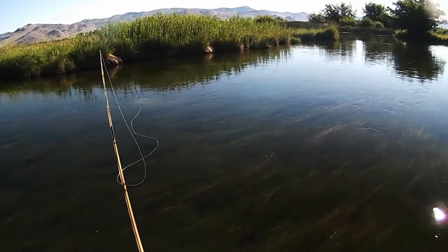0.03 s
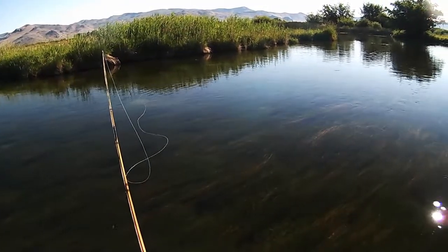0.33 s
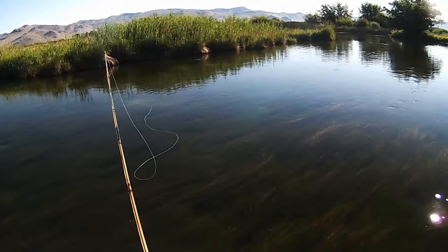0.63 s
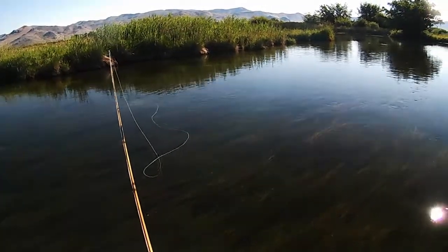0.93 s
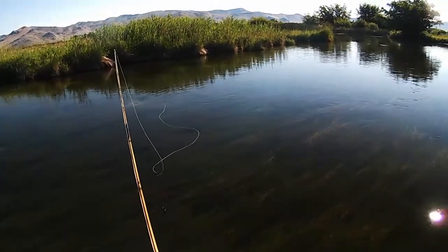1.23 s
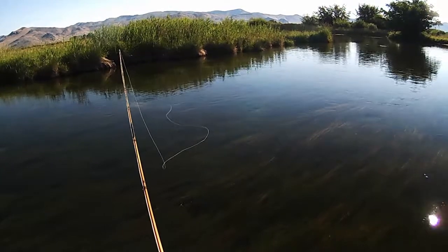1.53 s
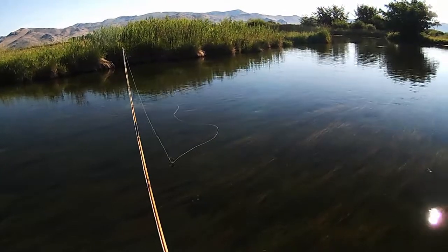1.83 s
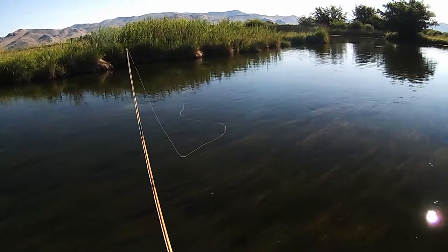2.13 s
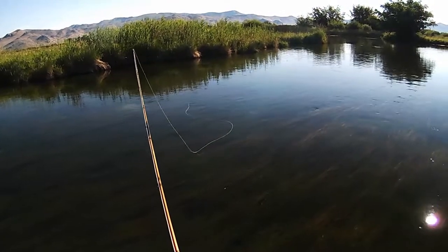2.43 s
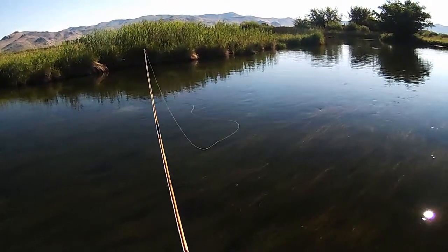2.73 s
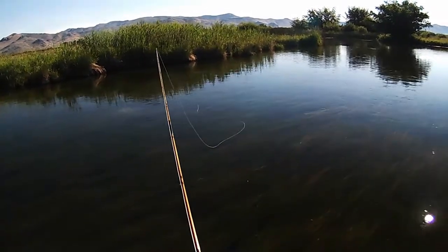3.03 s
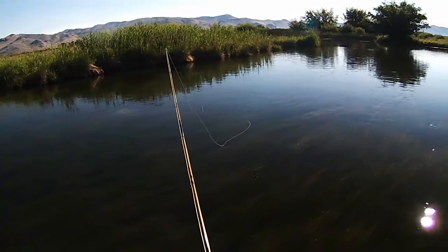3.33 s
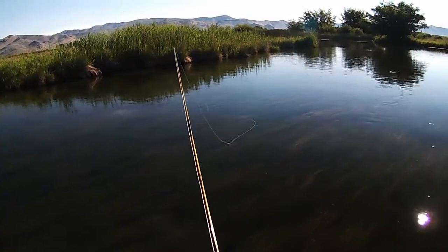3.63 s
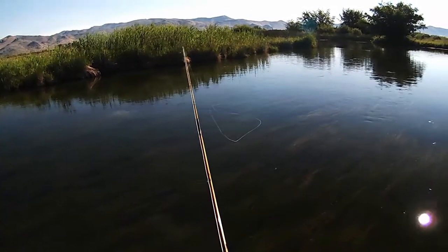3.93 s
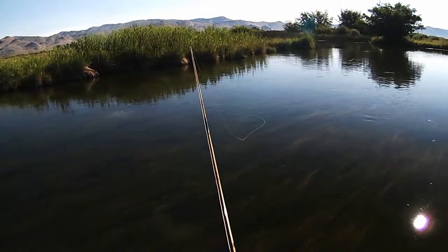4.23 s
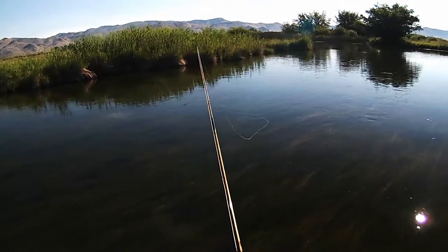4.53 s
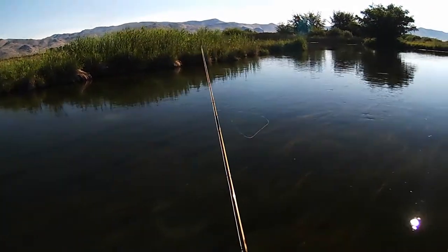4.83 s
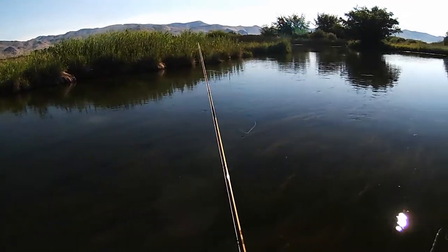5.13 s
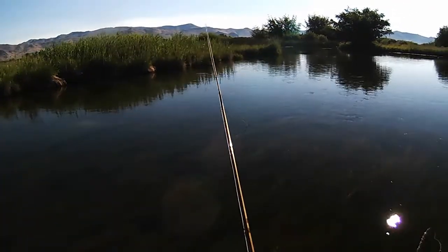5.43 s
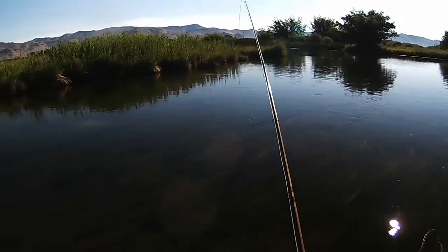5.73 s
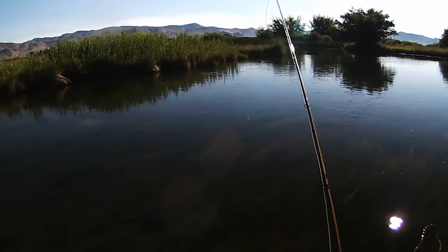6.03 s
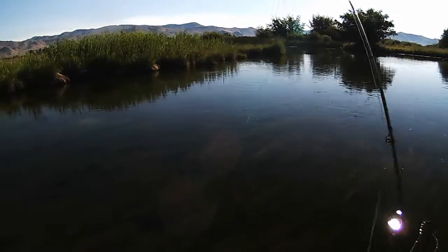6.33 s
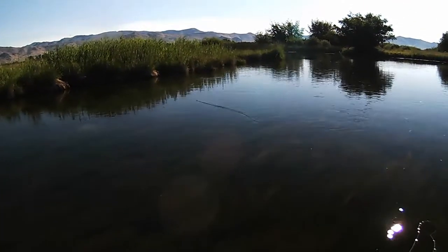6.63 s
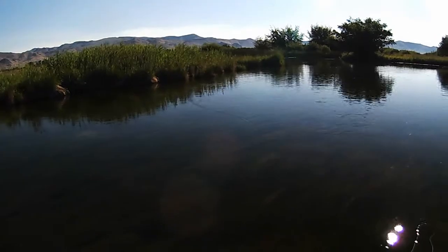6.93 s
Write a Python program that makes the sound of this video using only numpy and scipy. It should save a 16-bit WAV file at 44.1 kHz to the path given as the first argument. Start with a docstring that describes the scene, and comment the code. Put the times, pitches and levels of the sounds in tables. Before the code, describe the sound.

A dull, steady wash of stream water fills the open air, with a faint hiss and a thin electrical buzz. Light gusts buffet the microphone early on and again toward the end. Scattered soft knocks and clicks come from a fishing rod handled nearby, bunching up late with a sleeve rustle and a faint slide of line. Far birds add high, quiet chirps, mostly in the second half.

```python
"""On the bank of a calm stream, water washes and gurgles under a high hiss and a faint far drone.
Far birds whistle, and light wind pushes on the microphone. An angler's hand bumps the rod, the line
zips, ticks and slides through its guides (the rings on the rod), and a sleeve rustles as the rod lifts.
The small camera adds a thin buzz, one pulse a picture, and mirrors its treble about 8 kHz."""
import sys
import numpy as np
from scipy import signal
from scipy.fft import rfft, irfft
from scipy.io import wavfile

SR = 44100
rng = np.random.default_rng(int(sys.argv[2]) if len(sys.argv) > 2 else 0)


def transcribe(signal):
    """Save signal, clipped to [-1, 1], as a 16-bit WAV file at the path in sys.argv[1]."""
    frames = np.atleast_2d(signal).T
    limited = np.clip(frames, -1, 1)
    pcm = np.round(limited * 32767).astype(np.int16)
    wavfile.write(sys.argv[1], SR, pcm)


N = 307377
TIME, FREQS = np.arange(N) / SR, np.fft.rfftfreq(N, 1 / SR)

# The tone colours of six noises. Each row: frequency in Hz, relative level in dB.
WASH_SPECTRUM = [(15, -10.5), (68, 2.5), (100, -1), (160, -1), (235, -2.5), (310, -6.5), (480, -11.5),
                 (680, -16), (900, -19), (1400, -26.5), (1900, -30), (2600, -34), (3400, -39.5),
                 (6000, -65.5)]  # stream and open air
HISS_SPECTRUM = [(500, -14), (3000, -22), (4600, 1), (6000, 4.5), (7100, 2.5), (8000, -5.5)]  # high hiss
GURGLE_SPECTRUM = [(120, -25.5), (300, 0.5), (500, 1), (700, -1), (900, -16.5), (1500, -23.5),
                   (3000, -39.5)]  # gurgling water
WIND_SPECTRUM = [(5, -9), (15, 0.5), (31, 2.2), (50, -5.7), (90, -14.5), (200, -27), (600, -78)]  # wind on the microphone
CLOTH_SPECTRUM = [(60, -6), (130, 9.5), (500, 5.5), (1050, 2.5), (1700, -9.5), (2600, -9), (3500, -24),
                  (7000, -22)]  # rubbing cloth
SLIDE_SPECTRUM = [(700, -11), (1200, 11.5), (2600, -0.5), (4600, 0.5), (7000, 8.5), (8000, -4.5)]  # line sliding through the guides

# Sounds that swell and fade. Each row: time of the peak in seconds, length in seconds, level in dB.
EDDY_SWELLS = [(.35, 0.95, -61), (1.85, 0.44, -56.5), (2.9, 0.61, -57.5), (4.5, 0.77, -58.5),
               (5.5, 0.81, -55.5), (6.9, 0.54, -60)]  # eddies passing along the bank
WIND_GUSTS = [(1.16, .08, -47.5), (1.3, .16, -45.5), (1.66, .14, -47.5), (1.85, .14, -43), (2.09, .15, -42),
              (2.65, .4, -54), (3.22, .3, -53), (5.41, .07, -47), (5.58, .2, -42), (5.87, .12, -42),
              (6.08, .16, -42.5), (6.33, .1, -43), (6.55, .22, -40), (6.88, .22, -42)]  # gusts on the microphone
SLEEVE_STROKES = [(5.62, 0.2, -53.5), (5.8, 0.15, -55.5)]  # the sleeve rubbing as the rod comes up
LINE_PULLS = [(5.365, 0.04, -66), (5.405, 0.042, -67.5), (5.46, .04, -76), (5.74, 0.21, -74),
              (5.87, .05, -73), (6.03, 0.14, -78), (6.54, 0.18, -72.5), (6.78, 0.68, -70)]  # pulls of line through the guides

# Bird notes, each part of an arch in pitch. Each row: start in seconds, length in seconds,
# base level in dB, top pitch in Hz, place of the top from 0 to 1, amount of bend from 0 to 1.
BIRD_NOTES = [ (2.551, 0.047, -76, 7680, 0, 1), (2.602, 0.052, -78, 7800, 0.1, 1),
              (4.61, 0.063, -81, 6350, 0.3, 0.74), (4.832, 0.071, -74.5, 5900, .33, 1),
              (5.01, .04, -77, 4820, .6, .3), (5.05, 0.069, -71.5, 6020, 0.33, 0.98),
              (5.228, 0.046, -74, 4830, .8, .6), (5.274, 0.06, -69.5, 5970, 0.21, 1),
              (5.433, 0.053, -73, 7040, 0.4, .1), (5.519, 0.044, -70, 6900, .3, .15),
              (5.646, 0.053, -73, 6050, .9, .5), (5.785, .02, -73, 4900, 1, 1),
              (5.806, 0.039, -76, 6020, 0.8, .45), (5.913, 0.072, -70, 5920, 0.85, 0.72),
              (6.015, 0.092, -71.5, 7150, 0.01, 0.8)]
# The strength of the bird's voice over its range. Each row: pitch in Hz, boost in dB.
BIRD_VOICE = [(4300, 2), (5200, -3), (5900, 5), (7000, 2.5)]
# Slow shoves of air on the microphone. Each row: start in seconds, level in dB, length in seconds.
AIR_SHOVES = [(1.815, -34.5, .024), (2.058, -30, .04)]
# Soft bumps of the hand on the rod. Each row: start in seconds, level in dB, pitch in Hz,
# seconds to fade by 60 dB.
HAND_BUMPS = [(.711, -36.5, 390, 0.038), (.973, -30.5, 198, 0.032), (1, -37.5, 212, 0.073),
              (3.288, -33, 218, .027), (3.297, -35.5, 213, 0.049), (3.613, -35.5, 213.6, 0.12),
              (3.938, -33, 197, 0.029), (4.113, -35.5, 241, 0.091), (5.554, -23, 253, 0.01),
              (6.169, -23.5, 208, 0.015), (6.399, -40.5, 216, 0.12)]
# The line ticking against the rod. Each row: start in seconds, knock pitch in Hz, knock level in dB,
# click level in dB.
LINE_TICKS = [(0.4137, 1500, -59, -49), (1.581, 1480, -43, -53.5), (2.887, 1390, -48, -70),
              (3.013, 1610, -48, -67), (3.109, 1420, -44.5, -51.5), (3.112, 1410, -50, -66),
              (3.26, 1560, -44, -59), (4.393, 1450, -47, -52), (5.553, 1000, -47, -52),
              (5.609, 1300, -50, -60), (5.62, 1500, -50, -52), (5.633, 2440, -46, -63),
              (5.721, 1500, -56, -62), (5.772, 1700, -53, -52), (5.817, 1500, -60, -52.5),
              (5.848, 1070, -42, -62), (5.997, 2430, -43, -76)]
# The strength of the camera's mirrored treble. Each row: frequency in Hz, gain in dB.
MIRROR_GAIN = [(8000, 0.5), (9000, -4), (10000, -8), (11000, -16)]


def amp(db):
    """Turns decibels into a number to multiply by."""
    return 10 ** (np.asarray(db) / 20)


def unit(x):
    """Scales a signal to an average (rms) strength of 1."""
    return x / np.sqrt(np.mean(x ** 2) + 1e-20)


def level_at(spectrum, hz):
    """Looks up a level between a table's rows, on a musical (log) frequency scale."""
    row_hz, row_db = np.transpose(spectrum)
    return np.interp(np.log(hz + 1), np.log(row_hz + 1), row_db)


def add(mix, start_s, sound):
    """Mixes a sound in at its start time."""
    part = mix[round(start_s * SR):][:len(sound)]
    part += sound[:len(part)]


def colour(x, spectrum):
    """Gives a signal a tone colour and a strength of 1."""
    return unit(irfft(rfft(x) * amp(level_at(spectrum, FREQS)), N))


def wander(rate_hz):
    """A random wobble of strength 1, with up to about rate_hz changes a second."""
    return unit(irfft(rfft(rng.standard_normal(N)) * np.exp(-(FREQS / rate_hz) ** 2), N))


def grains(per_s, spread_db):
    """Tiny clicks at random times; more spread makes their sizes more uneven."""
    size = amp(spread_db * np.minimum(rng.exponential(1, N), 4))
    return unit(size * rng.choice([-1, 1], N) * (rng.random(N) < per_s / SR))


def swells(rows):
    """Loudness over time: one bell-shaped hill a row, its length taken at half power."""
    powers = (amp(db) ** 2 * .5 ** ((2 * (TIME - peak) / length) ** 2) for peak, length, db in rows)
    return np.sqrt(sum(powers))


def progress(start_s, length_s):
    """Runs from 0 to 1 during an event."""
    return np.clip((TIME - start_s) / length_s, 0, 1)


def glide(hz, gain, rough, rough_hz):
    """One gliding tone of unsteady strength."""
    return gain * (1 + rough * wander(rough_hz)) * np.sin(2 * np.pi * np.cumsum(hz) / SR)


def ring(hz, db, fade_s, scrape, rise_cycles=.8):
    """A short ring with a soft start and a speck of scraping noise."""
    t = np.arange(SR // 16) / SR
    band = signal.butter(2, [hz / 2.4, min(hz * 0.91, SR / 3)], "band", fs=SR, output="sos")
    speck = unit(signal.sosfilt(band, rng.standard_normal(len(t))))
    gain = amp(db - 60 * t / fade_s) * (1 - np.exp(-t * hz / rise_cycles))
    return gain * (np.sin(2 * np.pi * hz * t) + scrape * speck)


def far_drone(hz=122, width_hz=8.2, db=-61):
    """A band of noise so narrow that it sounds like a low, wavering tone."""
    band = 1 / (1 + ((FREQS - hz) / width_hz * 2) ** 2)
    return amp(db) * unit(irfft(rfft(rng.standard_normal(N)) * band, N))


def stream(wash_db=-49, hiss_db=-73.5):
    """Water and open air: a dull wash with small ripples in it, under a smooth high hiss."""
    water = rng.standard_normal(N) + 0.28 * grains(per_s=300, spread_db=0.5)
    wash = colour(water, WASH_SPECTRUM) * amp(.5 * wander(11))
    hiss = colour(rng.standard_normal(N), HISS_SPECTRUM) * amp(.45 * wander(20))
    return amp(wash_db) * wash + amp(hiss_db) * hiss


def eddies():
    """Small overlapping gurgles swell and sink with the current."""
    gurgles = colour(grains(per_s=900, spread_db=1.5), GURGLE_SPECTRUM) * amp(0.6 * wander(25))
    return swells(EDDY_SWELLS) * unit(gurgles)


def bird_whistle(top_hz=2697, sag_hz=58, db=-77.2):
    """A far bird's one long whistle swells and fades, its pitch sagging at both ends."""
    phase = progress(start_s=.53, length_s=.5)
    hz = top_hz - sag_hz * np.cos(np.pi * phase ** .8) ** 2
    return glide(hz, amp(db) * np.sqrt(abs(np.sin(np.pi * phase))), rough=0.22, rough_hz=14)


def bird_song(full_bend_hz_per_s=51000, round_top_s=0.0096, echo_fade_s=0.15):
    """Thin arching notes from the far bank, blurred by echoes from the reeds."""
    song, wobble = np.zeros(N), wander(370)
    for start, length, db, top_hz, top_at, bend in BIRD_NOTES:
        phase = np.linspace(0, 1, round(length * SR))
        from_top_s = np.hypot((phase - top_at) * length, round_top_s) - round_top_s
        hz = top_hz - bend * full_bend_hz_per_s * from_top_s
        hz *= 1 + 0.017 * wobble[round(start * SR):][:len(phase)]
        gain = amp(db + level_at(BIRD_VOICE, hz)) * np.sqrt(abs(np.sin(np.pi * phase)))
        add(song, start, gain * np.sin(2 * np.pi * np.cumsum(hz) / SR))
    song *= amp(3.0 * wander(100))  # the level flutters
    t = np.arange(SR // 5) / SR
    reeds = rng.standard_normal(len(t)) * amp(-60 * t / echo_fade_s)
    return song + 0.6 * signal.oaconvolve(song, reeds / np.linalg.norm(reeds))[:N]


def camera_buzz(pictures_per_s=29.9925, first_s=.02087, pulse_s=.001, db=-43.5):
    """Each picture draws a square pulse of current that leaks into the sound."""
    pulses = 1. * ((TIME - first_s) % (1 / pictures_per_s) < pulse_s)
    thinned = signal.lfilter(*signal.butter(1, 50, "high", fs=SR), pulses)
    rounded = signal.lfilter(*signal.butter(3, 1750, fs=SR), thinned)
    return -amp(db) * rounded


def wind(breeze_db=-56):
    """A drifting breeze and gusts press on the microphone and make a lumpy rumble."""
    breeze = amp(breeze_db - 1.8 * wander(0.75))
    rumble = colour(rng.standard_normal(N), WIND_SPECTRUM) * amp(-2.0 * wander(8.7))
    return np.hypot(breeze, swells(WIND_GUSTS)) * unit(rumble)


def air_shoves():
    """Each shove is one slow swing of air pressure: down, up and back to rest."""
    out = np.zeros(N)
    for start, db, length in AIR_SHOVES:
        phase = np.arange(0, 1, 1 / (length * SR))
        add(out, start, -amp(db) * np.sin(2 * np.pi * phase) * np.sin(np.pi * phase))
    return out


def rubbing(strokes, spectrum, per_s, spread_db, clump_db):
    """Rubbing cloth or line makes many little slips, which come in clumps during each stroke."""
    slips = colour(grains(per_s, spread_db), spectrum) * amp(clump_db * wander(30))
    return swells(strokes) * unit(slips)


def hand_bumps(rise_s=0.0009):
    """The rod's grip swings briefly after each bump and soon comes to rest."""
    out, t = np.zeros(N), np.arange(SR // 8) / SR
    for start, db, hz, fade_s in HAND_BUMPS:
        gain = amp(db - 60 * t / fade_s) * (1 - np.exp(-t / rise_s))
        add(out, start, gain * np.sin(2 * np.pi * hz * t))
    return out


def line_ticks(knock_cycles=17):
    """The line strikes: the rod knocks, and a guide gives a brighter, shorter click."""
    out = np.zeros(N)
    for start, knock_hz, knock_db, click_db in LINE_TICKS:
        knock = ring(knock_hz, knock_db, fade_s=knock_cycles / knock_hz, scrape=0.66)
        click = ring(hz=6270, db=click_db, fade_s=0.0045, scrape=0.63)
        add(out, start, knock + click)
    return out


def line_zip(from_hz=355, to_hz=1540, db=-49.3, fade_db=3.5):
    """The line speeds up over a guide, so its pitch climbs as it fades, with a weaker tone beneath."""
    phase = progress(start_s=.706, length_s=.072)
    hz = from_hz * (to_hz / from_hz) ** phase
    gain = amp(db - fade_db * phase) * abs(np.sin(np.pi * phase)) ** .6
    upper = glide(hz, gain, rough=0.25, rough_hz=200)
    lower = glide(hz * .54, gain * amp(-2.0), rough=0.37, rough_hz=200)
    return upper + lower


def scene():
    """Adds the angler, air and water, the birds and the camera's buzz into one channel."""
    sleeve = rubbing(SLEEVE_STROKES, CLOTH_SPECTRUM, per_s=1200, spread_db=2.5, clump_db=2.0)
    line_slide = rubbing(LINE_PULLS, SLIDE_SPECTRUM, per_s=1800, spread_db=0.9, clump_db=3.0)
    angler = sleeve + line_slide + hand_bumps() + line_ticks() + line_zip()
    background = wind() + air_shoves() + stream() + eddies() + far_drone()
    return (background + bird_song() + bird_whistle() + camera_buzz() + angler)[None]


def record(dry, notch_hz=4020, notch_width_hz=380, mirror_hz=8000, top_hz=11000):
    """The camera cuts out a narrow band, its slow converter mirrors the treble, and the top is cut off."""
    from_notch = ((FREQS - notch_hz) / notch_width_hz) ** 2
    direct = rfft(dry[0]) * from_notch / (1 + from_notch) * (FREQS < mirror_hz)
    # Multiplying by a tone at twice mirror_hz makes an upside-down copy of the spectrum.
    mirrored = rfft(irfft(direct, N) * 2 * np.cos(2 * np.pi * 2 * mirror_hz * TIME))
    sound = irfft(direct + mirrored * amp(level_at(MIRROR_GAIN, FREQS)), N)
    top_cut = signal.firwin(161, top_hz, window=("kaiser", 8), fs=SR)
    return signal.oaconvolve(sound, top_cut, "same")[None]


dry = scene()
out = record(dry)
transcribe(out)
```